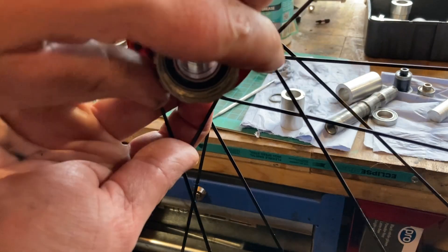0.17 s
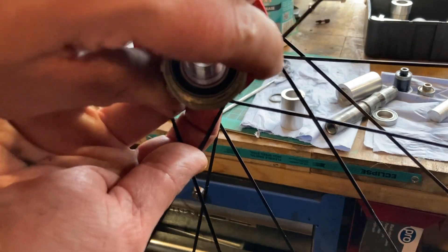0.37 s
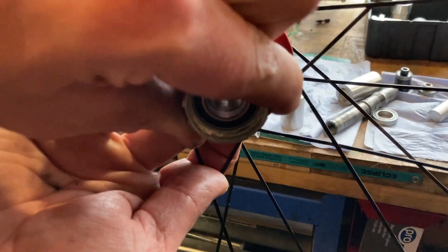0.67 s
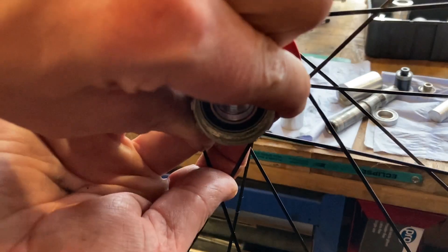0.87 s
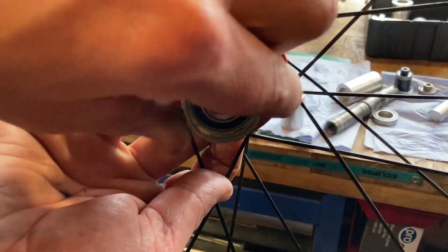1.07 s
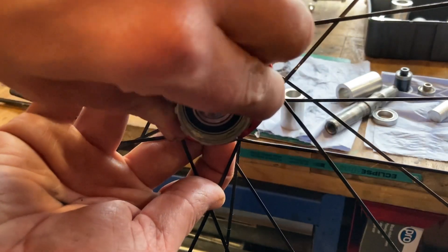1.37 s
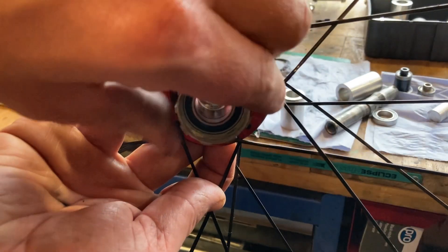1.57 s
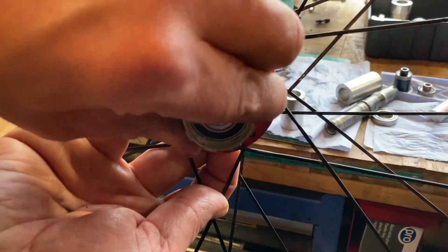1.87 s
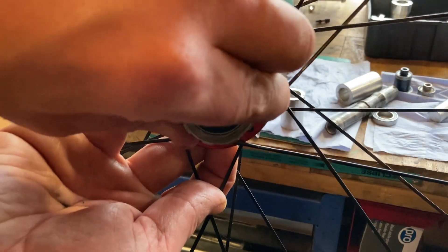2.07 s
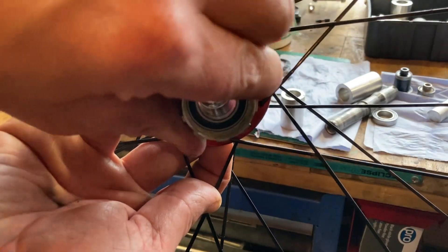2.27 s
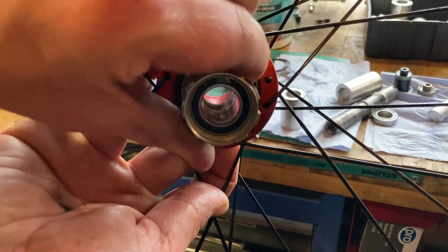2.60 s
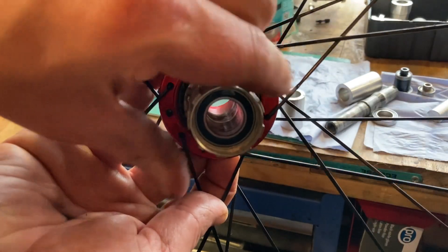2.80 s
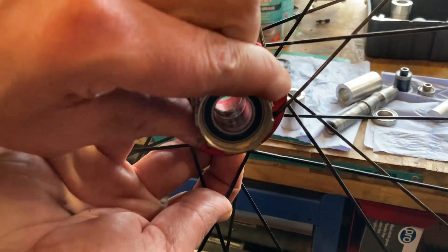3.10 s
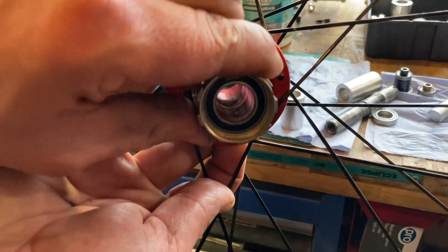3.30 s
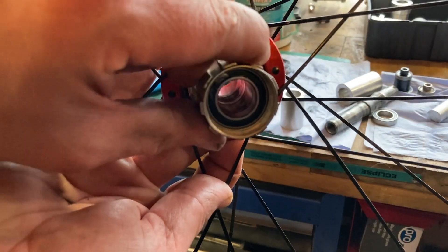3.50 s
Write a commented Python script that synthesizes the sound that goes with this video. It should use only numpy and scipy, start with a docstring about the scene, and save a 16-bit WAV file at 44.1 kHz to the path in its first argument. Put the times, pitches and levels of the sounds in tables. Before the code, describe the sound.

Sharp ratchet clicks come from a bicycle wheel hub turned by hand near the microphone, sparse at first, then in two rapid, irregular bursts. Soft metal scrapes and finger rubbing fill the gaps, over quiet small-workshop room tone.

```python
"""A bicycle freehub body is worked into its hub by hand, close up, in a small workshop.
The pawls snap over the ratchet teeth in short uneven runs; each snap cracks in the hub shell,
pings at its own pitch, scatters through wheel and room and leaves the spokes ringing.
Metal scrapes and fingers rub in between, as streams of tiny contacts on the same resonances.
Underneath lie quiet room tone and the low rumble of the handled wheel."""
import sys
import numpy as np
from scipy import signal
from scipy.io import wavfile

SR = 44100
rng = np.random.default_rng(int(sys.argv[2]) if len(sys.argv) > 2 else 0)


def master(y):
    """Save y as 16-bit WAV."""
    cut = np.clip(np.atleast_2d(y).T, -1, 1)
    pcm = np.round(cut * 32767)  # scale
    wavfile.write(sys.argv[1], SR, pcm.astype(np.int16))


N = 160965
T = np.arange(N) / SR

# pawl snaps and knocks of the hub body: start_s, thud_db, clack_db, snap_db, sizzle_db, ping_hz
CLICKS = [ (0.6328, -53.5, -30.5, -29.5, -41.5, 2120), (0.7824, -64.5, -25.5, -29.5, -41, 1400),
          (0.867, -91, -70, -52, -82, 5000), (1.9314, -44.5, -15, -28.5, -42.5, 1617),
          (2.162, -38, -19, -36, -47, 1355), (2.172, -32.5, -19.5, -20, -23, 8370),
          (2.1762, -71, -27, -16.5, -21, 12900), (2.183, -37, -26, -16.5, -47, 1900),
          (2.189, -40, -13, -16.5, -28, 1620), (2.195, -68.5, -29, -12, -16, 7600),
          (2.2018, -48, -18, -19, -18, 11000), (2.3061, -42, -40, -26.5, -35, 5470),
          (2.3165, -47, -26, -26, -29, 10000), (2.3793, -46.5, -32, -82, -66, 1750),
          (2.4305, -39, -19, -17, -21, 7610), (2.433, -40.5, -37.5, -38, -33, 2000),
          (2.476, -35.5, -27, -22, -29, 3445), (2.491, -49.5, -26, -27, -27.5, 8600),
          (2.5177, -45, -17.5, -17, -18, 12450), (2.6024, -54.5, -27.5, -30, -42.5, 2540),
          (3.0890, -47, -32, -63.5, -80.5, 1530), (3.1702, -42.5, -22, -18, -21.5, 1660),
          (3.2855, -48.5, -18.5, -17, -19.5, 7120), (3.338, -34, -30.5, -36, -55, 1390),
          (3.3429, -48.5, -18, -17, -19, 9700), (3.375, -48, -34, -26.5, -27, 11950),
          (3.4083, -55, -21, -16.5, -13.5, 11100), (3.4155, -43, -23, -14, -15, 1610),
          (3.4641, -87, -22.5, -19, -18.5, 1710), (3.4705, -62, -21.5, -18, -28, 3090),
          (3.4845, -59, -29, -16.5, -15, 4570)]
# how alike left and right are in the diffuse sound: freq_hz, correlation
STEREO_LIKENESS = [(60, 1), (330, .88), (640, -0.069), (1400, -0.064), (6800, 0.069), (15000, 0.75)]
# how the ringing and scatter lean to the left: freq_hz, left_minus_right_db
STEREO_LEAN = [(150, -1), (380, 2), (700, -2), (1300, -0.1), (2400, 3), (5000, 0)]


def from_db(db):
    """Decibels to gain."""
    return 10 ** (np.asarray(db) / 20)


def unit_rms(x):
    """Scale each channel to unit rms."""
    return x / np.sqrt(np.mean(x ** 2, axis=-1, keepdims=True) + 1e-20)


def at_hz(rows, hz, column=1):
    """Read a column of a table on a log-frequency axis."""
    rows = np.array(rows)
    return np.interp(np.log(hz), np.log(rows[:, 0]), rows[:, column])


def pan(lean_db):
    """Left and right gains, lean_db apart."""
    return from_db(np.array([[lean_db], [-lean_db]]) / 2)


def ring(blows, hz, t60):
    """Each blow sets a damped resonance ringing, with nothing in the bass."""
    decay, angle = from_db(-60 / (t60 * SR)), 2 * np.pi * hz / SR
    return signal.lfilter([.5, 0, -.5], [1, -2 * decay * np.cos(angle), decay * decay], blows + 1e-18)


def swell_and_fade(energy, t60, swell_s):
    """Energy builds up briefly after each blow, then dies away."""
    decay, rise = 10 ** (-6 / (t60 * SR)), np.exp(-1 / (swell_s * SR))
    return signal.lfilter([1 - rise], [1, -decay - rise, decay * rise], energy + 1e-18)


def noise_bands():
    """Third-octave stereo noises of unit rms, alike in the bass, as pairs of centre_hz, noise."""
    edges_hz = 22 * 2 ** (np.arange(30) / 3)
    white, bands = rng.standard_normal((2, 2, N + 8000)), []
    for k, (low, high) in enumerate(zip(edges_hz, edges_hz[1:])):
        bandpass = signal.butter(2, [low, high], "band", fs=SR, output="sos")
        mid, side = signal.sosfilt(bandpass, white[k % 2])[:, -N:]
        hz = np.sqrt(low * high)
        alike = at_hz(STEREO_LIKENESS, hz)
        bands.append((hz, unit_rms(np.sqrt(1 + alike) * mid + np.sqrt(1 - alike) * side * [[1], [-1]])))
    return bands


def level_at(hz, thud, clack, snap, sizzle):
    """Level of a contact in dB at one frequency, blended from its four registers."""
    # register edges: thud_top_hz, clack_low_hz, clack_top_hz, snap_low_hz, snap_top_hz, sizzle_low_hz
    edges_hz = [450, 1300, 2300, 4800, 8000, 11500]
    shares = [np.interp(np.log(hz), np.log(edges_hz), row) for row in np.eye(len(edges_hz))]
    return np.dot(shares, [thud, clack, clack, snap, snap, sizzle])


def force(contacts, hz, spread_db=0):
    """One impulse per contact at its strength for hz; with spread, each blow favours different modes."""
    start_s, *levels = contacts.T
    db = level_at(hz, *levels)
    if spread_db:
        db = db + spread_db * rng.standard_normal(4000)[:len(start_s)]
    return np.bincount((start_s * SR).astype(int), from_db(db), N)[:N]


def scrape_grains():
    """Each scrape is a run of tiny contacts that swells and fades: rows of time and register levels."""
    # sliding metal and dragging fingers: start_s, length_s, thud_db, clack_db, snap_db, sizzle_db
    scrapes = [(0, .06, -59.5, -60, -113, -88), (0.243, 0.4, -67.5, -64.5, -82, -84),
               (1.259, 0.39, -76, -74.5, -79, -79), (1.801, 0.024, -74, -53.5, -61, -78),
               (2.138, 0.027, -46.5, -34.5, -44, -56), (2.173, .034, -40, -11, -38, -21),
               (2.825, 0.24, -66.5, -61.5, -65, -87), (2.985, 0.045, -46, -47.5, -48.5, -66),
               (3.026, .09, -42.5, -36, -60.5, -81), (3.138, 0.06, -55.5, -46.5, -47, -75),
               (3.348, .1, -45.5, -35, -37, -46)]
    grains_per_s, grain_db, spread_db = 490, -11, 2
    grains = []
    for start_s, length_s, *levels in scrapes:
        count = int(length_s * grains_per_s)
        place, size = rng.random(1000)[:count], rng.standard_normal(1000)[:count]
        arch_db = 10 * np.log10(np.sin(np.pi * place))
        db = grain_db + arch_db + spread_db * size
        grains.append(np.column_stack([start_s + length_s * place, np.add.outer(db, levels)]))
    return np.vstack(grains)


def hub_shell(contacts):
    """The dry crack: each contact lands twice and rings the shell for a few milliseconds."""
    # quickly damped modes of the hand-held shell: pitch_hz, level_db, t60_s, left_minus_right_db
    modes = [(890, -23.5, 0.0067, 3), (1358, -1, 0.0066, 6), (1920, 3.5, .007, 7.5),
             (2887, -3, 0.0011, 14.5), (4350, -1, 0.0018, 4), (5800, -11, 0.001, 3),
             (7230, 6, 0.0024, -1.5), (10430, 6.5, 0.0064, 0.5), (12040, 5, 0.004, 0),
             (15400, -1.5, 0.0027, 1)]
    shell_db, left_lag_s = -2, .00018
    bounce_db, bounce_s = -10, 0.00045
    bounces = contacts + bounce_db
    bounces[:, 0] = contacts[:, 0] + bounce_s * (.5 + rng.random(4000)[:len(contacts)])
    landings = np.vstack([contacts, bounces])
    crack = 0
    for k, (hz, db, t60, lean_db) in enumerate(modes):
        blows = force(landings, hz, spread_db=2.5)
        crack = crack + (-1) ** k * from_db(db) * pan(lean_db) * ring(blows, hz, t60)
    left, right = crack
    return from_db(shell_db) * np.array([np.interp(T - left_lag_s, T, left), right])


def spokes(contacts):
    """The wheel takes up each blow and rings on, its modes out of step with each other and across sides."""
    # ringing spokes and rim: pitch_hz, level_db
    modes = [(339.2, -6.5), (356, -3.5), (376.7, -10), (474, -13.5), (550, -17), (772, -15.5), (904, -15.5),
             (1204, -22.5), (1405, -19.5), (1528, -18), (1612, -16), (1660, -19.5), (1937, -15.5),
             (2040, -17), (2284, -25.5), (2645, -20), (2750, -26), (3054, -22), (4258, -27.5), (6490, -27),
             (7530, -24.5)]
    spokes_db, swell_s = -3.5, 0.0014
    lowest_hz, lowest_t60_s = modes[0][0], 0.4
    ringing, t = 0, T[:SR // 2]
    for k, (hz, db) in enumerate(modes):
        t60 = lowest_t60_s * (lowest_hz / hz) ** 0.31   # higher modes die sooner
        envelope = from_db(-60 * t / t60) * (1 - np.exp(-t / swell_s))
        right_phase = (-1) ** k * np.arccos(at_hz(STEREO_LIKENESS, hz))
        phase = 2 * np.pi * (hz * t + rng.random()) + np.array([[0], [right_phase]])
        tone = envelope * np.sin(phase) * pan(at_hz(STEREO_LEAN, hz))
        blows = force(contacts, hz, spread_db=2.5)
        ringing = ringing + from_db(db + spokes_db) * signal.fftconvolve(blows[None], tone)[:, :N]
    return ringing


def scatter(contacts, bands):
    """Dense wheel resonances, the same for every blow, and a diffuse tail that differs each time."""
    # scatter off hands, bench and walls: freq_hz, early_db, late_db, late_t60_s
    reflections = [(86, -33.5, -35.5, 0.12), (170, -27, -16.5, 0.17), (250, -31.5, -37.5, 0.1),
                   (385, -20, -21, 0.13), (524, -17, -18, 0.56), (674, -35, -32.5, 0.093),
                   (855, -15, -25.5, 0.36), (1100, -20.5, -33, 0.47), (1472, -6.5, -26.5, 0.43),
                   (1980, -12.5, -22, 0.23), (2814, -15, -21.5, 0.18), (5230, -15, -23, 0.15),
                   (7500, -9, -23.5, 0.14), (11300, -6.5, -22.5, 0.16), (16200, -20, -32.5, 0.078)]
    early_t60_s, early_swell_s, late_swell_s = 0.018, 0.0017, 0.0013
    diffuse_share = 0.54   # of the late energy
    wash, impulse = 0, signal.unit_impulse(SR // 2)
    for hz, noise in bands:
        if hz > reflections[0][0] / 2:
            early_db, late_db, t60 = (at_hz(reflections, hz, column) for column in (1, 2, 3))
            early = from_db(early_db) ** 2 * swell_and_fade(impulse, early_t60_s, early_swell_s)
            late = from_db(late_db) ** 2 * swell_and_fade(impulse, t60, late_swell_s)
            energy = early + (1 - diffuse_share) * late
            response = unit_rms(np.sqrt(energy) * noise[:, :len(impulse)]) * np.sqrt(np.mean(energy))
            blows = force(contacts, hz)
            resonances = signal.fftconvolve(blows[None], response)[:, :N]
            tail_energy = diffuse_share * swell_and_fade(blows ** 2, t60, late_swell_s)
            tail = from_db(late_db) * np.sqrt(tail_energy) * noise
            wash = wash + pan(at_hz(STEREO_LEAN, hz)) * (resonances + tail)
    return wash


def room_tone(bands):
    """A quiet bed of workshop noise, each band wavering a little on its own."""
    # colour of the room tone: freq_hz, level_db
    spectrum = [(35, -3), (65, 1.5), (110, -16), (200, -7), (500, -18), (900, -21.5), (2000, -28.5),
                (8000, -35), (16000, -40.5)]
    room_db, waver_db = -69.5, 1.2
    bed = 0
    for hz, noise in bands:
        waver = np.interp(T, np.linspace(0, T[-1], 50), rng.standard_normal(50))
        bed = bed + noise * np.sqrt(hz) * from_db(at_hz(spectrum, hz) + waver_db * waver)
    return from_db(room_db) * unit_rms(bed)


def handling_rumble():
    """The wheel rumbles as it is handled: an octave of deep noise that rises and falls."""
    # rumble envelope: time_s, level_db
    swells = [(0, -67), (1.8, -72.5), (2.2, -65), (2.8, -68), (3.1, -66.5), (3.35, -61.5), (3.65, -74)]
    top_hz = 54.3
    bandpass = signal.butter(2, [top_hz / 2, top_hz], "band", fs=SR, output="sos")
    rumble = signal.sosfilt(bandpass, rng.standard_normal(N))
    return from_db(np.interp(T, *np.transpose(swells))) * unit_rms(rumble)


def ping(start_s, hz, db, t60):
    """A small steel part rings briefly at one pitch; a few neighbouring resonances carry it on faintly."""
    swell_s, afterring_db, afterring_t60_s = 0.00019, -15, 0.075
    t = T[:SR // 3]
    strike = from_db(-60 * t / t60) * np.sin(2 * np.pi * hz * t + np.array([[0], [1]]))
    neighbours_hz = hz * (1 + .2 * rng.uniform(-1, 1, (8, 1, 1)))
    cluster = np.sin(2 * np.pi * (neighbours_hz * t + rng.random((8, 2, 1)))).sum(axis=0)
    afterring = unit_rms(cluster) / np.sqrt(2) * from_db(afterring_db - 60 * t / afterring_t60_s)
    attack = 1 - np.exp(-t / swell_s)
    tone = from_db(db) * pan(at_hz(STEREO_LEAN, hz)) * attack * (strike + afterring)
    return np.pad(tone, ((0, 0), (int(start_s * SR), N)))[:, :N]


def steel_parts():
    """Every click pings in proportion to how hard it strikes at that pitch; light touches only ping."""
    # light touches of small steel parts: start_s, pitch_hz, level_db, t60_s
    tinks = [(2.9879, 3500, -21.5, 0.0053), (3.018, 1370, -42, 0.047)]
    ping_db, ping_t60_s = -5, 0.019
    pings = [(start_s, hz, ping_db + level_at(hz, *levels), ping_t60_s) for start_s, *levels, hz in CLICKS]
    return sum(ping(*row) for row in pings + tinks)


def scene():
    """Clicks and scrapes sound through shell, spokes and room, over room tone and rumble."""
    bands = noise_bands()
    contacts = np.vstack([np.array(CLICKS)[:, :-1], scrape_grains()])
    freehub = hub_shell(contacts) + spokes(contacts) + scatter(contacts, bands) + steel_parts()
    return freehub + room_tone(bands) + handling_rumble()


def record(dry):
    """The centre of the stereo image has dips in the treble; deep bass and the very top are cut."""
    # narrow treble dips in the centre of the stereo image: freq_hz, q, depth (0-1)
    dips = [(9175, 6.4, 1), (13600, 10, 0.7)]
    low_cut_hz, high_cut_hz = 41.7, 16100
    for hz, q, depth in dips:
        dry = dry - depth * signal.lfilter(*signal.iirpeak(hz, q, fs=SR), dry.mean(axis=0))
    dry = signal.sosfilt(signal.butter(4, low_cut_hz, "high", fs=SR, output="sos"), dry)
    return signal.sosfilt(signal.ellip(10, .2, 70, high_cut_hz, fs=SR, output="sos"), dry)


dry = scene()
out = record(dry)
master(out)
```